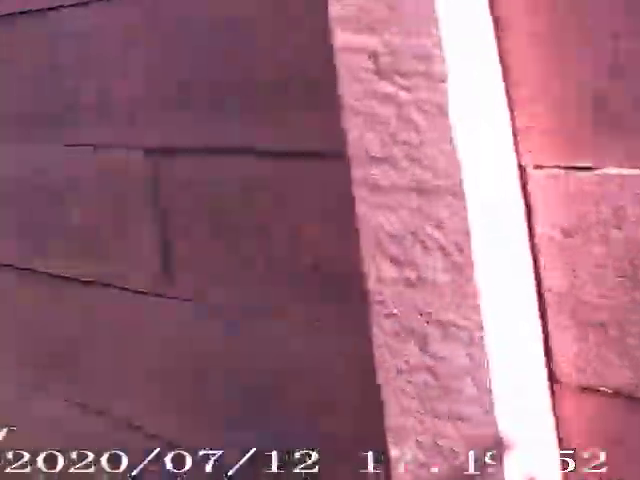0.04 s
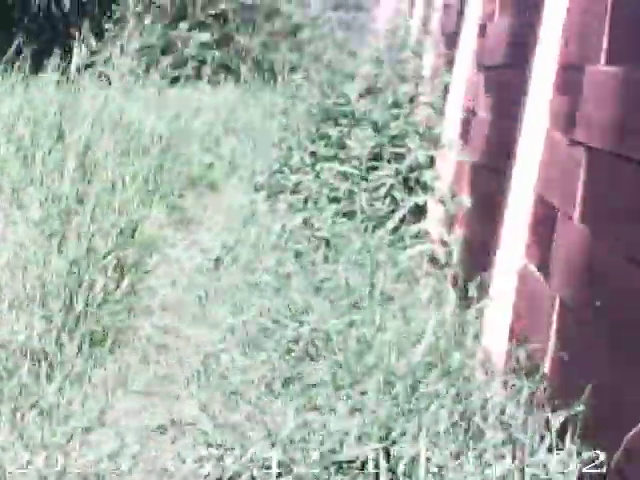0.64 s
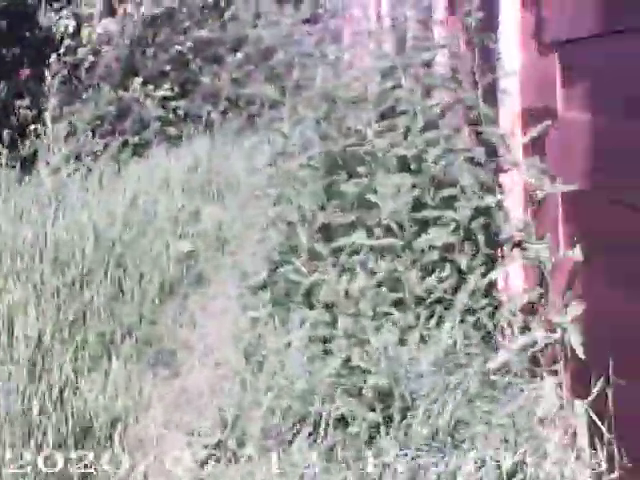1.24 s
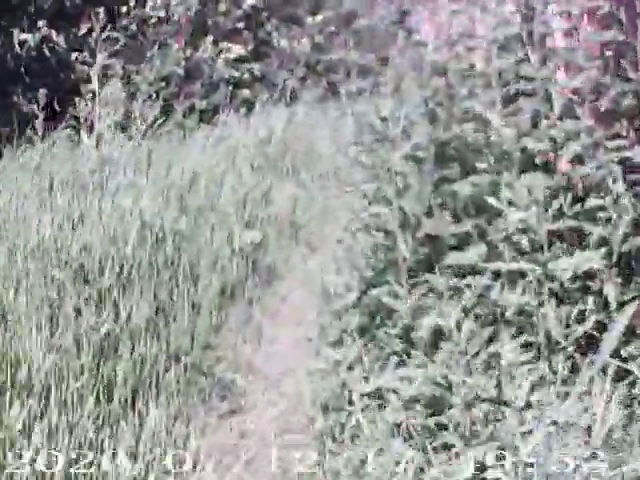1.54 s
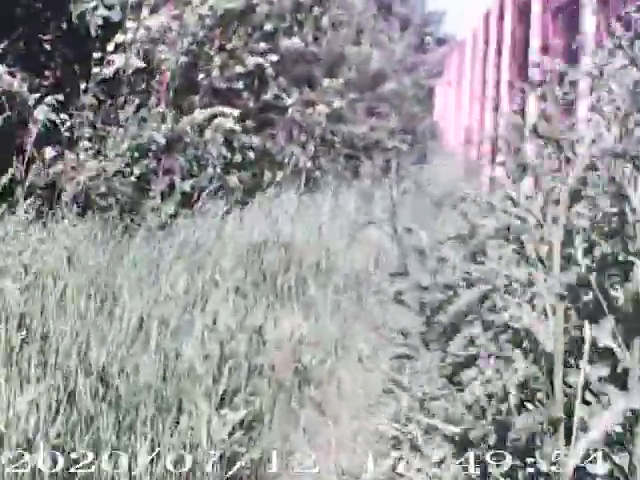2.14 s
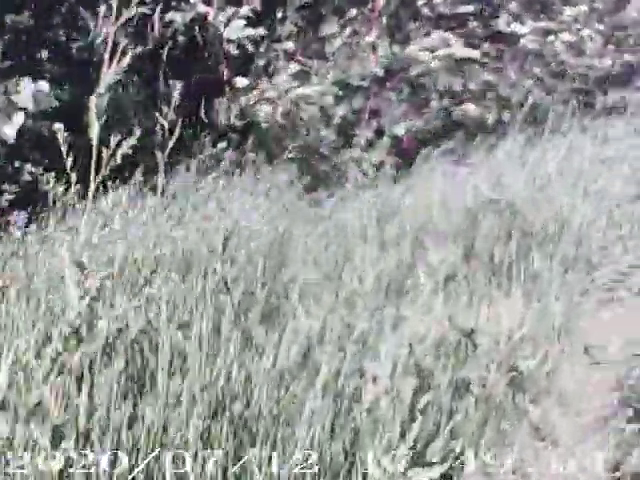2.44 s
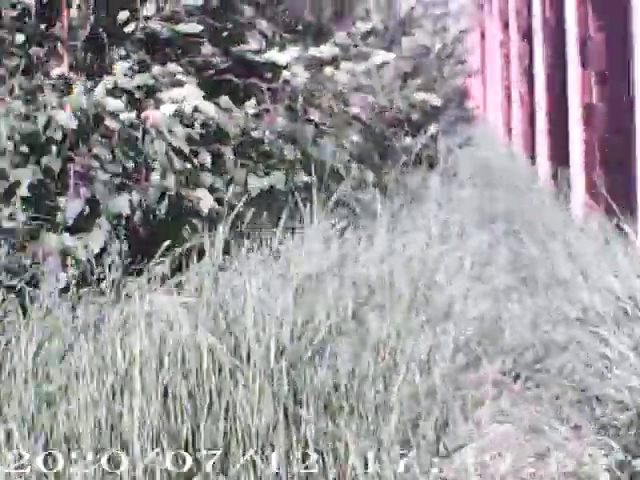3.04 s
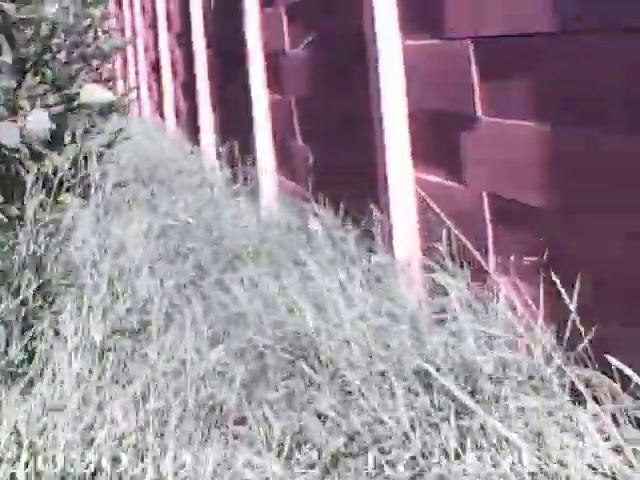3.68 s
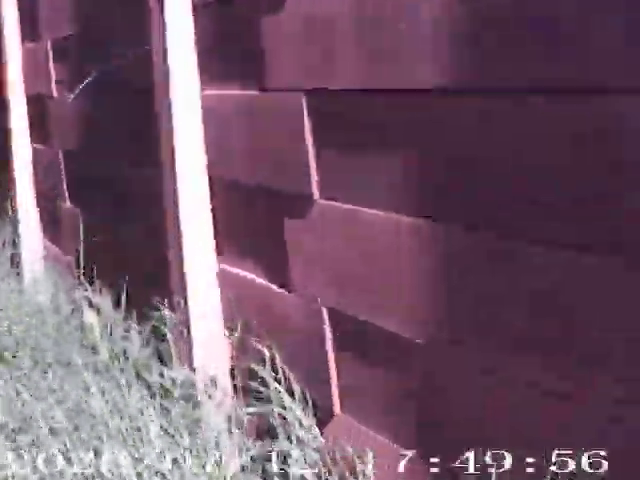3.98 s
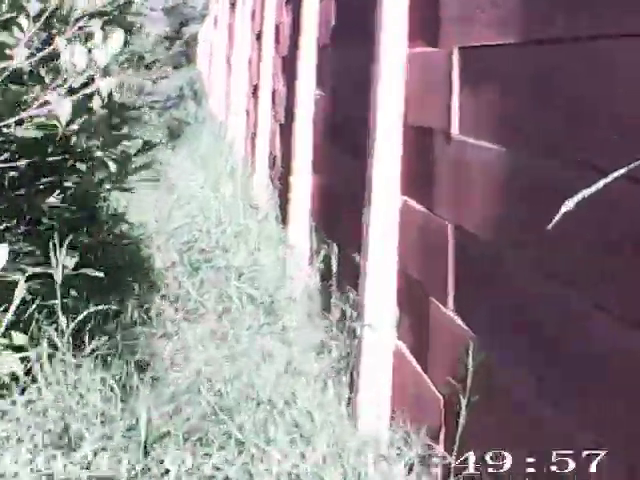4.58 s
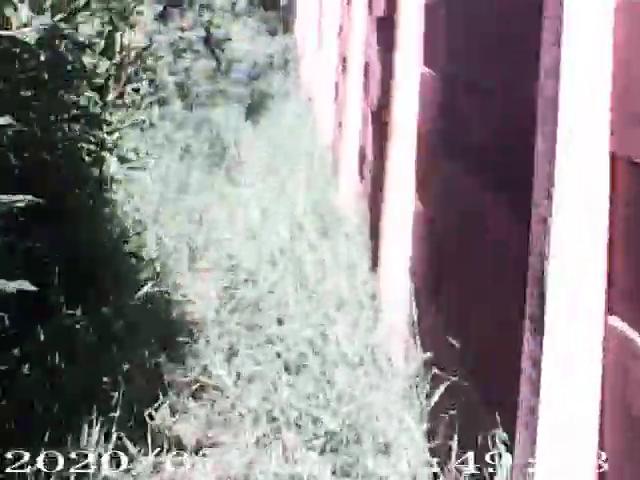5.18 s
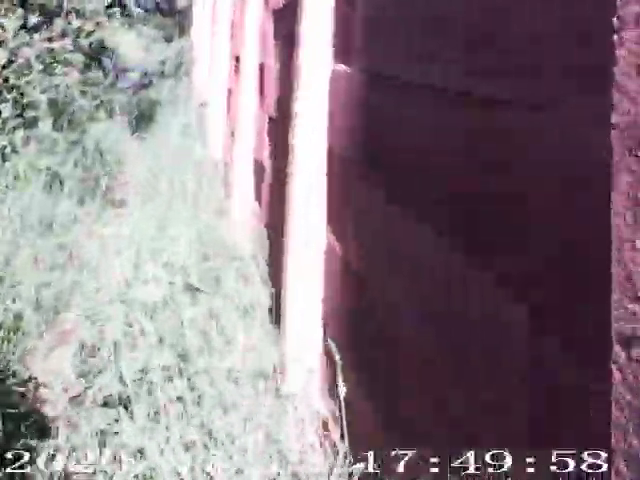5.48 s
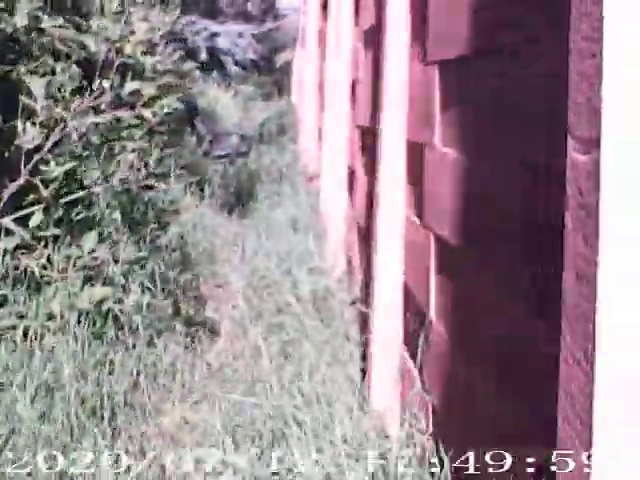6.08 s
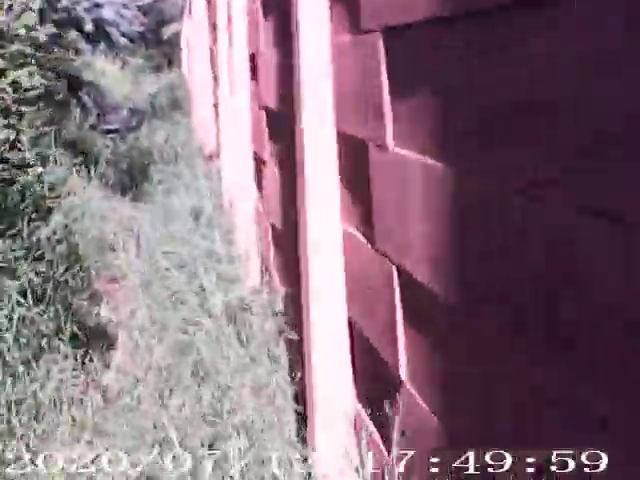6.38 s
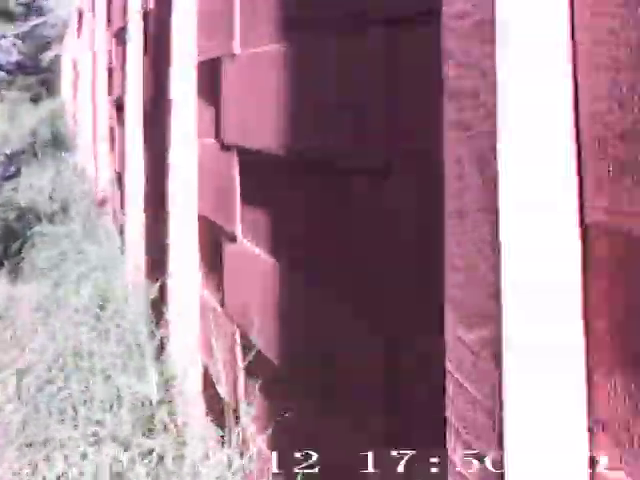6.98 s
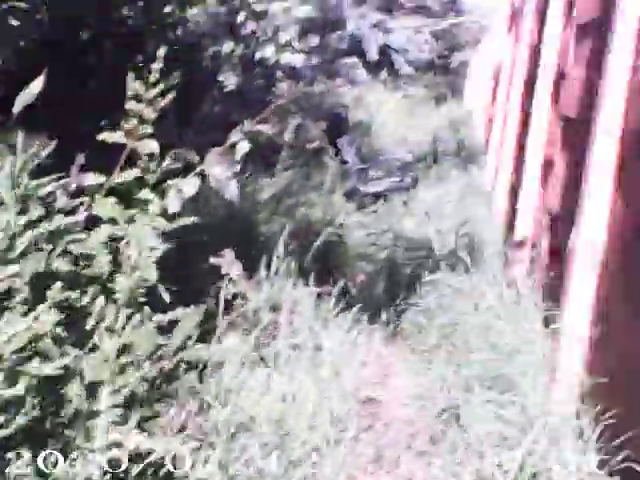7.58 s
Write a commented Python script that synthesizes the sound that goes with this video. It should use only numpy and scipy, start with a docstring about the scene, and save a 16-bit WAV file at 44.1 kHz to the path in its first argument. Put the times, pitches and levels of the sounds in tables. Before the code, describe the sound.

A bicycle knocks and rattles over a rough grassy trail, with grass swishing and wind buffeting its mounted camera's microphone.

```python
"""A rough grassy trail, heard up close from the microphone of a cheap camera mounted on a bicycle.
At first loose parts clack, with a few hard knocks, over swishing tyres and the drone of the mount.
At 2.2 s a big bump's pressure surge pins the input stage: it thumps in, chokes all sound, thumps out.
From 3.4 s the ride gets rougher: knocks crack through more surges, then long grass hisses past.
Gusts buffet the microphone with sharp pressure snaps, thick and fast to the end."""
import sys
import numpy as np
from scipy import signal
from scipy.fft import rfft, irfft, next_fast_len
from scipy.io import wavfile
from scipy.ndimage import uniform_filter1d, map_coordinates

SR = 44100
rng = np.random.default_rng(int(sys.argv[2]) if len(sys.argv) > 2 else 0)


def transcribe(signal):
    """Save signal, clipped to [-1, 1], as a 16-bit WAV file at the path in sys.argv[1]."""
    frames = np.atleast_2d(signal).T
    limited = np.clip(frames, -1, 1)
    pcm = np.round(limited * 32767).astype(np.int16)
    wavfile.write(sys.argv[1], SR, pcm)


N = 345038
TIME = np.arange(N) / SR
LOW_CUT_HZ = 255.5

# Bumps felt at the microphone. Each row: start in seconds, length in seconds, level in dB, swings.
PRESSURE_SURGES = [(0.239, 0.034, 11, 1), (0.278, .047, 17, 1), (0.335, 0.056, 15.5, 1),
                   (2.217, .079, 35.5, 1), (2.301, 0.0096, 16, 1), (2.532, 0.022, 2, 1),
                   (2.928, 0.023, 12, 1), (3.155, 0.019, 3, 1), (3.391, 0.019, 9.5, 1),
                   (3.432, 0.023, 13.5, 1), (3.464, 0.041, 15, 4), (3.507, .036, 22, 2),
                   (3.549, 0.029, 13, 2), (4.573, 0.046, 2.5, 2), (4.664, 0.0094, 17, 1),
                   (4.695, 0.041, 21, 1), (4.893, 0.029, 24.5, 1), (5.262, 0.061, 8.5, 2),
                   (5.378, 0.0087, 9.5, 1), (5.526, 0.0096, 14, 1), (5.554, .023, 19, 1),
                   (5.638, .03, 16.5, 1), (5.675, 0.034, 9, 1), (5.765, .024, 9.5, 1),
                   (6.127, 0.017, 14.5, 1), (6.162, 0.0129, 5, 1), (6.231, 0.02, 12.5, 1),
                   (6.259, 0.039, 20, 1), (6.328, 0.036, 14, 1), (6.392, 0.025, 9.5, 1),
                   (6.457, 0.032, 15.5, 2), (6.502, 0.028, 15.5, 2), (6.548, 0.031, 16.5, 2),
                   (6.589, 0.022, 10, 2)]
# Hard knocks on the camera. Each row: time in seconds, contact in ms, chatter in ms.
CAMERA_KNOCKS = [(0.254, 0.16, 0), (0.2915, .22, 3), (0.3, 0.18, 1.5), (0.3624, 0.25, 1.5),
                 (2.2292, 0.55, 1.5), (2.2394, 0.3, 1.5), (2.2574, 0.56, -0.5), (2.6101, .6, 1),
                 (3.399, 0.35, 7.5), (3.414, 0.21, -1.5), (3.44, 0.49, 0), (3.4755, 0.29, 0),
                 (3.5148, .8, 0), (3.5355, 0.3, 0), (4.7038, 0.33, 3.5), (4.7218, 0.56, 6),
                 (4.9054, 0.57, 1), (4.923, 0.86, 1.5), (5.6531, 0.33, 0), (5.6948, 0.5, 3),
                 (5.7771, 0.32, 5), (6.3456, 0.18, 0), (6.408, 0.69, 2.1), (6.607, .45, 3.5),
                 (6.7188, 0.3, 0), (7.4729, 0.23, 0)]
# Sharp snaps and thuds at the microphone. Each row: time in seconds, level in dB.
PRESSURE_SNAPS = [(0.4411, -19), (0.9675, -29.5), (2.3456, -20), (3.6485, -6), (3.712, -30), (4.659, -9),
                  (4.7618, -16), (4.816, -11), (5.0381, -16), (5.05, -10), (5.2252, -32), (5.3997, -20.5),
                  (5.9577, -15.5), (6.0022, -12), (6.646, -7), (6.8114, -20.5), (6.8593, -22),
                  (6.8906, -17), (6.9759, -26), (7.0439, -17), (7.1323, -10.5), (7.231, -16),
                  (7.3165, -11.5), (7.3454, -17.5), (7.544, -16), (7.5877, -20), (7.6575, -17.5),
                  (7.7057, -14), (7.7802, -22.5)]
# Gusts at the microphone port. Each row: start in seconds, length in seconds, level in dB, pitch in Hz.
PORT_GUSTS = [(0.055, 0.054, -22, 105), (0.159, 0.023, -27.5, 90), (0.387, 0.038, -26, 120),
              (0.951, 0.036, -28, 138), (1.624, .03, -21, 70), (2.304, 0.1, -14, 100.3),
              (2.506, 0.019, -23, 73.6), (2.602, 0.015, -14, 128), (2.904, 0.092, -35.5, 160),
              (3.368, 0.22, -10, 166), (3.592, .075, -16.5, 124), (3.762, 0.012, -11.5, 110),
              (4.48, .022, -17.5, 145), (4.551, .068, -15.5, 108), (4.619, 0.16, -14.5, 84),
              (4.872, 0.016, -8, 133), (5.018, 0.064, -9, 140), (5.126, .037, -15.5, 139),
              (5.204, 0.059, -10.5, 141.6), (5.309, 0.043, -20.5, 191), (5.394, 0.023, -22, 130),
              (5.46, 0.016, -19, 210), (5.576, 0.039, -10.5, 131), (5.783, 0.019, -14, 103),
              (5.825, 0.021, -14.5, 161), (5.944, 0.063, -16, 122), (6.085, 0.022, -18, 110),
              (6.304, 0.022, -31, 129), (6.417, 0.034, -20.5, 120), (6.629, 0.047, -7.5, 155),
              (6.698, 0.034, -14.5, 228), (6.754, 0.085, -17, 148), (6.84, .06, -23.5, 188),
              (6.913, 0.017, -13.5, 99), (6.944, 0.044, -18.5, 130), (7.03, 0.028, -10, 115.5),
              (7.114, 0.032, -14, 166), (7.206, 0.073, -11, 152.3), (7.303, 0.062, -8, 132),
              (7.362, 0.079, -15, 122), (7.449, .11, -9, 139), (7.624, 0.038, -10, 106),
              (7.691, 0.024, -9.5, 176), (7.755, 0.032, -11, 140)]
# The colour of wind on the microphone. Each row: frequency in Hz, level in dB.
WIND_SPECTRUM = [(13, -23), (26, 0), (53, -1), (105, -5), (180, -16), (310, -25), (620, -35), (1300, -52.5),
                 (5300, -100)]
# Loose parts hitting the frame. Each row: start in seconds, level in dB, brightness in dB, strikes.
FRAME_CLACKS = [(0.047, -34.5, -8, 1), (0.107, -49, -1, 1), (0.456, -36.5, -2.5, 2),
                (0.513, -36.5, -3.5, 1), (0.612, -46, -0.5, 2), (0.8023, -31.5, -4, 2),
                (0.937, -57.5, 9.5, 1), (1.019, -51.5, 5, 1), (1.083, -35, -6.5, 3), (1.246, -44.5, -4, 1),
                (1.264, -42.5, -0.5, 1), (1.515, -36, -6, 3), (1.686, -33.5, -5, 1),
                (1.723, -37.5, -5.5, 3), (1.825, -39, -6, 4), (2.118, -14, -18.5, 1),
                (2.192, -17.5, -28, 1), (2.547, -54, 11, 1), (2.765, -35.5, -10, 1), (3.044, -35.5, -8, 1),
                (3.227, -41.5, -5.5, 1), (4.187, -23.5, -17, 1), (4.276, -33, -7.5, 1),
                (4.455, -23.5, -15, 1), (4.549, -26.5, -2.5, 1), (4.685, -13, -6.5, 1),
                (4.821, -31, -3.5, 1), (4.855, -19.5, -10.5, 1), (5.122, -40, 0, 1), (5.164, -28, -22, 1),
                (5.899, -31.5, -12, 1), (6.023, -35, -13, 1), (6.172, -25.5, -20, 2), (6.22, -28, -5.5, 1),
                (6.961, -43.5, 2, 1), (7.001, -37.5, 0, 1)]
# Resonances of housing and mount. Each row: frequency in Hz, level in dB, seconds to die away by 60 dB.
HOUSING_MODES = [(291.7, -8, 0.2), (434.5, 1.5, 0.051), (507, 7, 0.034), (700, -12.5, 0.087),
                 (794, -1, 0.023), (914, -13.5, 0.12), (1134, -4, 0.037), (1489, 4, 0.036),
                 (1730, 6.5, 0.0095), (1900, -14.5, 0.023), (2224, -10.5, 0.053), (2943, -10, 0.021),
                 (3250, -18, 0.0067), (4040, -10.5, 0.013), (4230, -12, 0.013)]
# The body, clack and tick ranges of a blow. Each row: low edge in Hz, high edge in Hz.
CLACK_BANDS = [(230, 1000), (1150, 3600), (3600, 4800)]
# How hard the ground shakes the mount. Each row: time in seconds, level in dB.
GROUND_SHAKE = [(0, -37), (.42, -32), (.8, -51.5), (1, -43), (1.18, -61), (1.35, -48), (1.55, -54),
                (2.12, -58.5), (2.34, -26), (2.76, -62), (3.05, -52), (3.35, -40), (3.85, -38), (4.15, -30),
                (5, -35.5), (5.9, -35.5), (7.45, -29), (7.8, -36)]
# How hard tyres and bike brush through the grass. Each row: time in seconds, level in dB.
GRASS_BRUSHING = [(0, -49.5), (.25, -45.5), (.5, -50), (.95, -56.5), (1.45, -54.5), (1.6, -45.5),
                  (2.05, -59), (2.2, -47.5), (2.8, -54.5), (3.6, -54.5), (3.9, -44), (4.27, -36.5),
                  (4.85, -37.5), (5.2, -42.5), (5.8, -47), (6.3, -36), (6.85, -50.5), (7.4, -44),
                  (7.8, -51.5)]
# The colour of grass heard through the housing. Each row: frequency in Hz, level in dB.
SWISH_SPECTRUM = [(100, -22), (180, -24), (300, -4.5), (520, 6), (680, -10), (950, -16.5), (1110, -13.5),
                  (1270, -19.5), (1530, -4), (1900, -20), (2220, -14), (2600, -33.5), (3150, -24),
                  (3700, -33.5), (7000, -53.5)]
# Stems on the bike. Each row: start in seconds, length in seconds, level in dB, first and last pitch in Hz.
STEM_RUBS = [(1.229, 0.065, -35.5, 573, 476), (1.56, 0.064, -39.5, 1478, 1450),
             (2.153, 0.072, -40, 1690, 2000), (2.176, 0.028, -52, 4400, 4300),
             (2.853, 0.032, -38.5, 504, 490), (4.04, 0.032, -30, 547, 505), (4.2, 0.081, -32.5, 567, 499),
             (4.198, 0.14, -54, 3140, 3380), (4.29, .115, -27.5, 367, 525), (4.851, 0.026, -16.5, 543, 506),
             (4.94, 0.096, -53, 3370, 3440)]


def surges(level_db=1, lead_s=0.00104, rest_s=0.00201):
    """A bump drives slow swells of pressure at the microphone, pushing and pulling in turn."""
    out, sign = np.zeros(N), 1
    for start, length, db, swings in PRESSURE_SURGES:
        period = (length + rest_s) / round(swings)
        swell_s = max(period - rest_s + 2 * lead_s, lead_s)
        swell = np.sin(np.linspace(0, np.pi, int(swell_s * SR)))
        for k in range(round(swings)):
            add(out, start + k * period - lead_s, sign * undb(db + level_db) * swell)
            sign = -sign
    return out


def knocks(force_db=41.5, chatter_gap_ms=3):
    """Each contact on the camera drives the diaphragm out and back, far into overload; some chatter."""
    out = np.zeros(N)
    for at, contact_ms, chatter_ms in CAMERA_KNOCKS:
        size = max(4, int(contact_ms * SR / 1000))
        push = undb(force_db) * np.sin(2 * np.pi * (np.arange(size) + .5) / size)
        strikes = 1 + max(0, int(chatter_ms / chatter_gap_ms + .42))
        for delay in np.linspace(0, chatter_ms / 1000, strikes):
            add(out, at + delay - size / SR / 2, push)
    return out


def snap(build_s, relax_s, edge_hz):
    """Pressure builds, flips the other way at the midpoint and relaxes."""
    t = TIME[:SR // 60]
    pressure = np.concatenate([np.exp(-t[::-1] / build_s), -np.exp(-t / relax_s)])
    return butter(pressure, edge_hz, "lowpass") / 2


def pressure_snaps(level_db=12):
    """Sharp snaps and thuds of pressure at the microphone, mostly the loudest crackles within gusts."""
    out = np.zeros(N)
    pulse = snap(build_s=0.002, relax_s=0.0015, edge_hz=1700)
    for (at, db), sign in zip(PRESSURE_SNAPS, rng.choice([-1, 1], len(PRESSURE_SNAPS))):
        add(out, at - len(pulse) / SR / 2, sign * undb(db + level_db) * pulse)
    return out


def gusts(wind_pitch_hz=150, snaps_per_s=190, crackle_db=5, crackle_db_per_octave=6):
    """Short, hard buffets straight on the microphone; quicker eddies sound higher and crackle more."""
    out = np.zeros(N)
    ticks = (rng.random(N) < snaps_per_s / SR) * rng.uniform(-0.61, 1, N)
    crackle = signal.fftconvolve(ticks, snap(build_s=0.0015, relax_s=0.00057, edge_hz=2800), mode="same")
    for start, length, db, hz in PORT_GUSTS:
        shift = hz / wind_pitch_hz
        snaps = crackle[int(start * SR):][:int(length * SR)]
        swell = signal.windows.tukey(len(snaps), 0.48)
        buffet = noise(np.multiply(WIND_SPECTRUM, [shift, 1]), size=SR // 2)[:len(snaps)] * swell
        snap_db = crackle_db + crackle_db_per_octave * np.log2(shift)
        add(out, start, undb(db) * (buffet / rms(low_cut(buffet)) + undb(snap_db) * snaps * swell))
    return out


def clacks(attack_s=0.0011, scrape_s=0.0014, chatter_s=0.014, rebound_s=0.025, loss_db=4.5, crack_db=-36):
    """A loose part strikes the frame, chatters and may rebound; each blow rings the housing and mount."""
    out, t = np.zeros(N), TIME[:SR // 8]
    onset = slice(SR // 32)
    hz, mode_db, t60 = np.transpose(HOUSING_MODES)[:, :, None]
    force = (1 - np.exp(-t / attack_s)) * (np.exp(-t / scrape_s) + 0.061 * np.exp(-t / chatter_s))
    for start, level, bright, strikes in FRAME_CLACKS:
        colour_db = [-1, bright, 2.26 * bright - 19]  # body, clack, tick: only bright blows chink
        for k in range(round(strikes)):
            at, db = start + k * rebound_s, level - k * loss_db
            detune = 1 + 0.015 * rng.standard_normal(hz.shape)
            modes = undb(mode_db) * 1000 ** (-t / t60) * np.sin(2 * np.pi * hz * detune * t)
            contact = force * rng.standard_normal(len(t))
            add(out, at, contact * undb(db + crack_db) / rms(contact[onset]))
            blow = signal.fftconvolve(contact, modes.sum(0))[:len(t)]
            for band, band_db in zip(CLACK_BANDS, colour_db):
                ring = butter(blow, band, "bandpass", order=4)
                add(out, at, ring * undb(db + band_db) / rms(ring[onset]))
    return out


def mount_drone(hz=61, wander=0.015, level_db=1, waver_db=1):
    """Rough ground shakes the camera mount at its own low resonance."""
    phase = 2 * np.pi * np.cumsum(hz * (1 + wander * walk(14))) / SR
    level = curve(GROUND_SHAKE) * undb(level_db + waver_db * walk(31))
    low_cut_makeup = np.hypot(1, LOW_CUT_HZ / hz)
    return level * low_cut_makeup * np.sqrt(2) * np.sin(phase)


def grass_swish(level_db=4, flicker_db=3.5, treble_db=2.5):
    """Tyres and stems swish just below the camera, hollow and wavering through the housing."""
    position = np.cumsum(1 + .025 * walk(22))  # an uneven pace makes the colour waver
    swish = map_coordinates(noise(SWISH_SPECTRUM), [position], order=3, mode="wrap")
    low = butter(swish, 1100, "lowpass")
    high = swish - low
    level = curve(GRASS_BRUSHING) * undb(level_db + flicker_db * walk(42))
    return level * (low + high * undb(treble_db))


def stem_creaks(relative_width=0.15):
    """A stem sticks and slips as it drags along the bike: a rough, narrow creak that glides."""
    out = np.zeros(N)
    for start, length, db, start_hz, end_hz in STEM_RUBS:
        size = int(length * SR)
        phase = 2 * np.pi * np.cumsum(np.linspace(start_hz, end_hz, size)) / SR
        grip = butter(rng.standard_normal((2, SR)), relative_width * start_hz / 2, "lowpass")[:, -size:]
        creak = grip[0] * np.cos(phase) + grip[1] * np.sin(phase)
        add(out, start, undb(db) * creak / rms(creak) * signal.windows.tukey(size, 0.53))
    return out


def wind_flutter(level_db=-17, growth=0.69, patchy_db=4.0, eddies_per_s=18):
    """Small eddies pass the microphone port all along, stronger the more the camera shakes."""
    air = noise(WIND_SPECTRUM)
    level = curve(GROUND_SHAKE) ** growth * undb(level_db + patchy_db * walk(eddies_per_s))
    return level * air / rms(low_cut(air))


def long_grass(start_s=3.76, length_s=1.36, level_db=-54, flicker_db=3):
    """Tall blades slide along the bike in a faint, fine hiss."""
    out, size = np.zeros(N), int(length_s * SR)
    hiss = butter(rng.standard_normal(N), 2800, "highpass") * undb(level_db + flicker_db * walk(46))
    add(out, start_s, hiss[:size] * signal.windows.tukey(size, 0.15))
    return out


def low_cut(x):
    """The microphone's coupling capacitor: a held pressure fades in under a millisecond."""
    return butter(x, LOW_CUT_HZ, "highpass", order=1)


def undb(db):
    """Decibels to gain."""
    return 10 ** (np.asarray(db) / 20)


def rms(x):
    """Root mean square."""
    return np.sqrt(np.mean(x ** 2)) + 1e-12


def curve(rows):
    """Gain over time from rows of seconds and dB."""
    return undb(np.interp(TIME, *np.transpose(rows)))


def add(out, start_s, x):
    """Mix x into out from start_s."""
    i = max(0, int(start_s * SR))
    out[i:i + len(x)] += x[:max(0, N - i)]


def butter(x, hz, kind, order=2):
    """Causal low-, high- or band-pass."""
    return signal.sosfilt(signal.butter(order, hz, kind, fs=SR, output="sos"), x)


def noise(spectrum, size=N):
    """Noise of rms 1, coloured by rows of Hz and dB."""
    hz, db = np.transpose(spectrum)
    n = next_fast_len(size)
    bin_hz = np.maximum(np.arange(n // 2 + 1) * SR / n, 1)
    gain = undb(np.interp(np.log(bin_hz), np.log(hz), db))
    x = irfft(rfft(rng.standard_normal(n)) * gain, n)[:size]
    return x / rms(x)


def walk(per_s):
    """A smooth random drift of rms 1, through per_s new values a second."""
    hold = int(SR / per_s)
    steps = np.repeat(rng.standard_normal(N // hold + 1), hold)
    drift = uniform_filter1d(uniform_filter1d(steps, hold), hold)[:N]
    return drift / rms(drift)


def scene(hiss_db=-58.5):
    """Bike, grass and air as pressure at the one microphone, over a faint steady hiss."""
    bike = clacks() + knocks() + mount_drone()
    grass = grass_swish() + stem_creaks() + long_grass()
    air = wind_flutter() + gusts() + pressure_snaps() + surges()
    return (bike + grass + air + undb(hiss_db) * rng.standard_normal(N))[None]


def record(dry, limit=0.92, knee=10, headroom=0.74, ceiling=0.7, band_hz=7150, top_hz=16500):
    """The camera's input stage saturates ahead of the low cut, so overload becomes thumps and silence."""
    pinned = dry / (1 + np.abs(dry / limit) ** knee) ** (1 / knee)
    thumps = np.clip(low_cut(pinned), -headroom, headroom)
    band_filter = signal.firwin(101, band_hz, fs=SR)[None]
    narrow = signal.fftconvolve(thumps, band_filter, mode="same")
    shaved = np.clip(narrow, -ceiling, ceiling)
    rounded = signal.fftconvolve(shaved, band_filter, mode="same")
    edge = undb(-12.0) * (shaved - rounded)  # a little of the clipping gets above the band
    return signal.sosfilt(signal.ellip(8, .2, 70, top_hz, fs=SR, output="sos"), rounded + edge)


dry = scene()
out = record(dry)
transcribe(out)
```